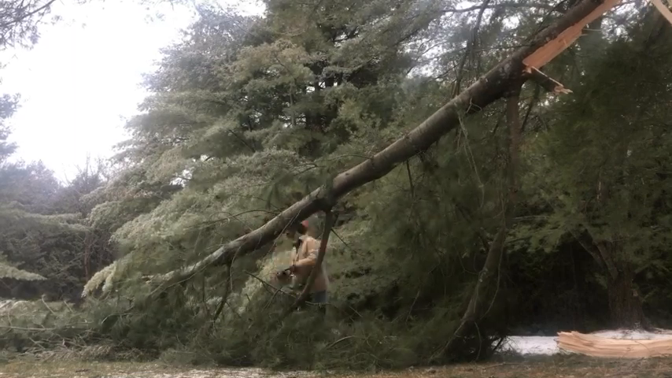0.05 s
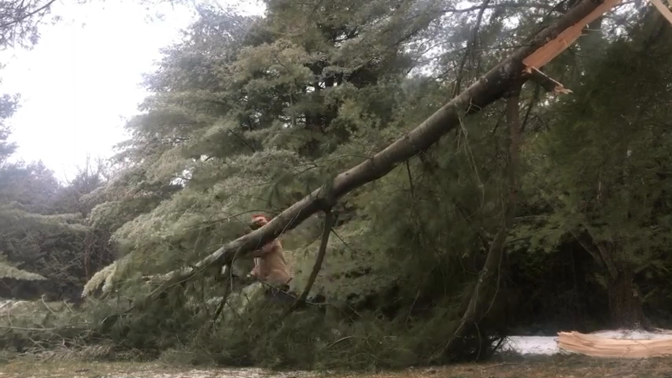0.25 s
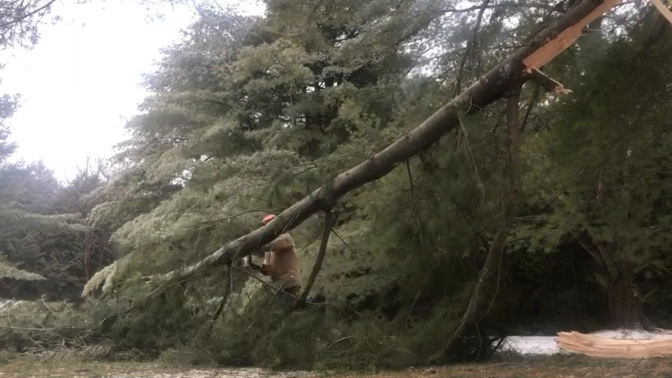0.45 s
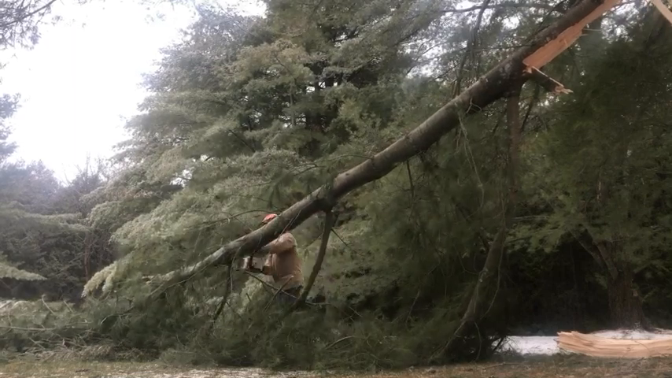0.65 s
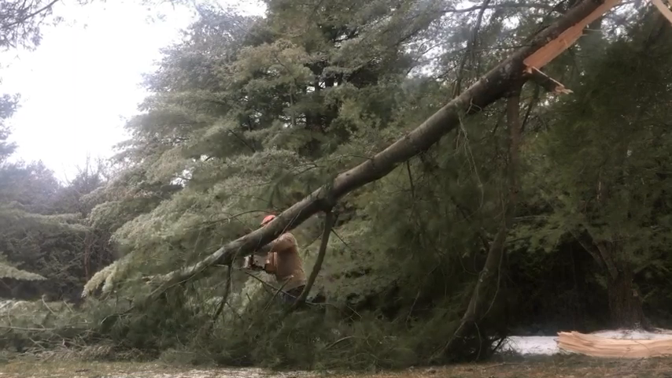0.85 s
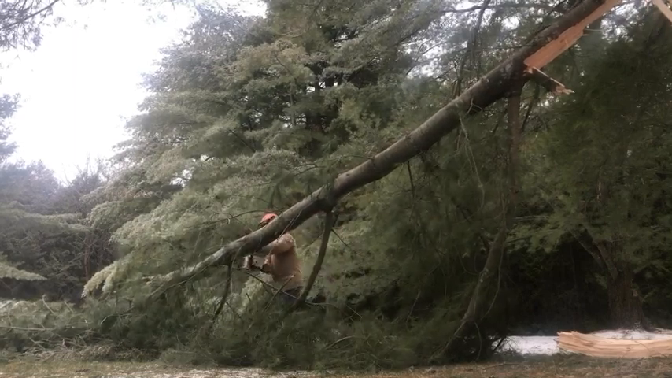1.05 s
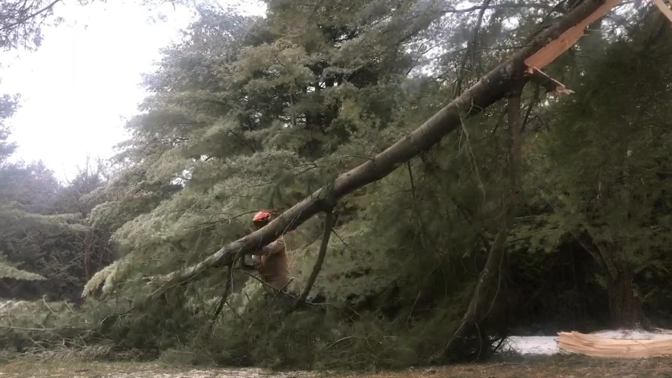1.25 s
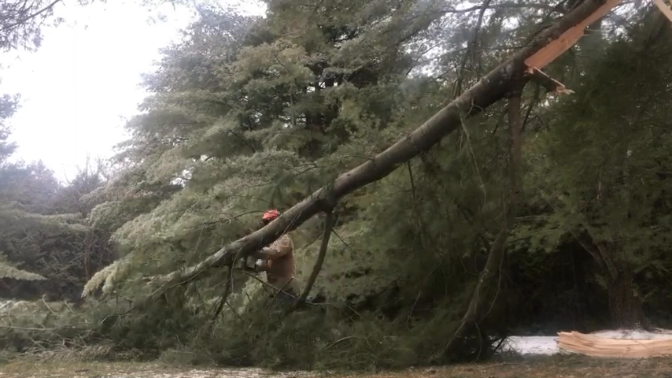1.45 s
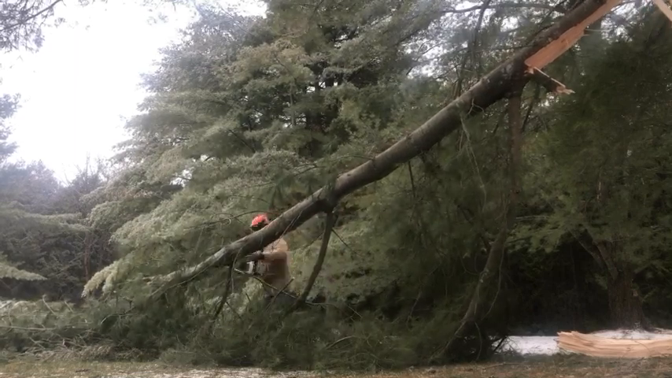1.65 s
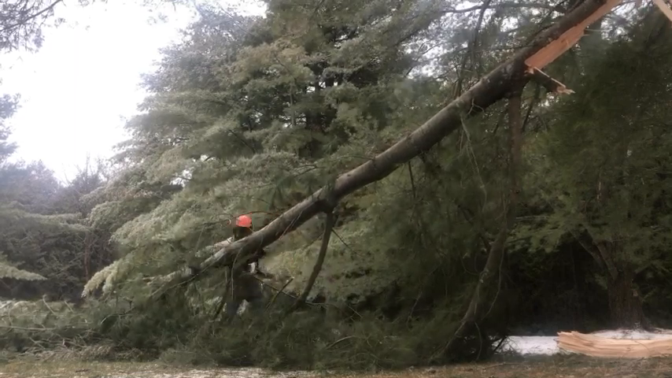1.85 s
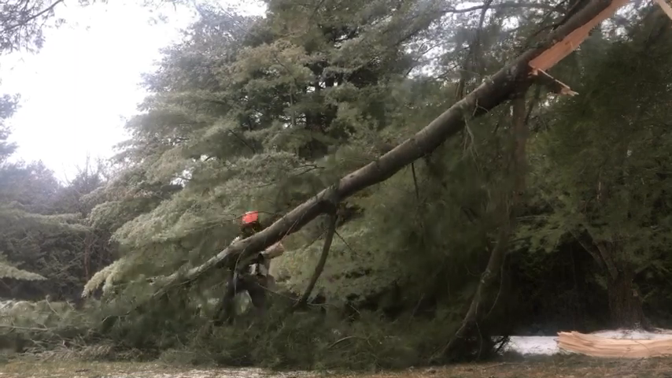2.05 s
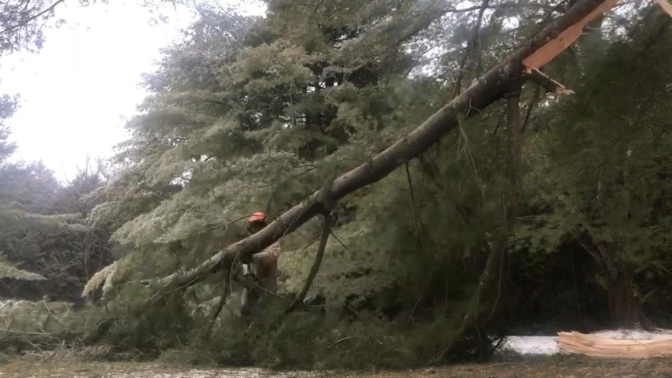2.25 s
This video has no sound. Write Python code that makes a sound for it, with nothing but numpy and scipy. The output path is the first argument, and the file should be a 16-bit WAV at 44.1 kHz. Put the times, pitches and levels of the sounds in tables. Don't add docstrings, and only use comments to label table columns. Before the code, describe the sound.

A two-stroke chainsaw ticks over briefly, blips its throttle, screams through a steady cut, then falls to an uneven puttering idle with sharp snaps and needle rustle; outdoors, some metres away, small peaky microphone.

```python
import sys
import numpy as np
from scipy import signal
from scipy.fft import rfft, irfft
from scipy.io import wavfile
from scipy.ndimage import uniform_filter1d

SR = 44100
rng = np.random.default_rng(int(sys.argv[2]) if len(sys.argv) > 2 else 0)


def transcribe(signal):
    frames = np.atleast_2d(signal).T
    limited = np.clip(frames, -1, 1)
    pcm = np.round(limited * 32767).astype(np.int16)
    wavfile.write(sys.argv[1], SR, pcm)


def linear_from_db(decibels):
    return 10 ** (np.asarray(decibels, float) / 20)


N = 101430

# freq_hz, level_db
TREE_SPECTRUM = [(120, -27), (350, -4), (900, -5.5), (1300, -17), (2000, -1.5), (3000, -8), (3500, -8),
                 (12000, -6)]
# start_s, muffler_hz, drone_db, puff_db, rustle_db
IDLE_COURSE = [(0, 215, -45, -31.5, -65), (.19, 215.5, -47, -36.5, -42.5), (1.3, 182.3, -41, -33, -51),
               (1.469, 186.4, -53, -34.5, -44), (1.62, 185.4, -48, -36, -50), (1.8, 195.3, -44, -34.5, -49),
               (1.901, 193.8, -37, -32, -62), (1.93, 217.8, -38, -33, -38),
               (2.05, 216.3, -37.5, -34, -42.5), (2.12, 230, -42, -36.5, -34),
               (2.199, 231, -39, -33, -35.5), (2.3, 236, -57, -32.5, -39.5)]
# freq_hz, width_hz, level_db
CASING_MODES = [(2820, 28, -2.5), (3477, 150, -4.5), (3840, 110, -1), (4400, 90, -5), (4760, 92, -17),
                (6300, 73, -12)]
# freq_hz, density_db (per Hz)
IDLE_AIR_SPECTRUM = [(30, -26), (90, -12.5), (220, -3.5), (400, -7.5), (700, -13.5), (1700, -24),
                     (3600, -16), (15800, -34)]
# freq_hz, width_hz, level_db
NEEDLE_BANDS = [(1370, 5000, -5.5), (4270, 880, 5), (6500, 260, -2), (7360, 990, -2), (8800, 1330, -1.5)]
# start_s, peak_db, top_end_db (against the peak)
SNAP_EVENTS = [(0.032, -25, -3), (0.059, -27, -3), (0.083, -36, -11), (0.1024, -21, -4), (0.121, -30, -16),
               (0.137, -26, -16), (0.157, -27, -8), (0.1795, -30, -6), (1.51, -23.5, -6), (1.57, -18.5, -6),
               (1.6584, -29, -8), (1.686, -21, -15), (1.712, -21.5, -1), (1.745, -21.5, -4),
               (1.7818, -20.5, -16), (1.8076, -20.5, -8), (1.8522, -24, 0), (1.8742, -24, -3),
               (1.889, -24, -6), (1.996, -22, -8), (2.078, -18.5, -14), (2.098, -22, -8), (2.1495, -20, -9),
               (2.271, -28, -8)]
# freq_hz, width_hz, level_db
THUMP_MODES = [(255, 70, 1.5), (514, 180, -2.5)]
# freq_hz, width_hz, level_db
SNAP_TOP_MODES = [(11500, 700, 1.4), (14600, 420, 0.2)]
# start_s, firing_hz, exhaust_db, hiss_db (chain and gas)
REV_BLIPS = [
    [(0.193, 106.3, -47, -61), (0.201, 111.6, -23, -30), (0.22, 124, -25.5, -22),
     (0.233, 132.4, -35, -22.5), (0.249, 124.2, -25, -27.5), (0.277, 176.2, -19.5, -17),
     (0.311, 216.6, -16.5, -16), (0.337, 179.2, -27.5, -18.5), (0.37, 138.1, -32, -20.5),
     (0.407, 100.3, -35, -27.5), (0.415, 98.3, -28.5, -15)],
    [(0.416, 115.6, -23, -31), (0.425, 134.7, -24, -18), (0.443, 153.8, -22, -17.5),
     (0.455, 145.2, -32, -19), (0.471, 131.5, -24.5, -20), (0.491, 165.5, -20, -15),
     (0.517, 200.3, -20, -16.5), (0.543, 209.2, -18.5, -15.5), (0.58, 184.4, -20, -16)],
    [(0.58, 187.2, -8, -17), (0.604, 214.1, -17, -18.5), (0.614, 220.7, -15, -13.5),
     (0.624, 207.5, -24.5, -16.5), (0.648, 183, -26, -17), (0.66, 170.5, -22, -20.5),
     (0.682, 179.4, -21.5, -16), (0.71, 168.3, -20, -16.5), (0.72, 178.7, -24.5, -19)],
]
# start_s, firing_hz, exhaust_db, hiss_db (chain and gas)
WOOD_CUT = [
    [(0.72, 183.6, -21, -13), (0.742, 206.9, -16, -16.5), (0.77, 219.3, -17, -16),
     (0.85, 220.7, -17.5, -13.5), (0.945, 217, -17, -15.5), (0.985, 225.7, -16.5, -14.5),
     (1.04, 227.4, -20, -17.5)],
    [(1.04, 228, -16.5, -19), (1.066, 228.4, -18, -14), (1.098, 191.2, -25.5, -18.5),
     (1.104, 188.9, -20.5, -16.5), (1.144, 223.3, -18, -17), (1.182, 207, -20, -15),
     (1.218, 165.5, -21.5, -17), (1.254, 163.1, -19.5, -17.5), (1.29, 167.7, -45, -26.5)],
    [(1.362, 103.3, -72, -56), (1.37, 103.3, -32.5, -34), (1.392, 107.4, -24.5, -25),
     (1.418, 103.9, -23, -23.5), (1.43, 95, -36, -29.5), (1.44, 99, -52, -21)],
]
# freq_hz, level_db
EXHAUST_RESPONSE = [(95, -3.5), (210, 2.5), (320, -2), (450, -1.5), (680, -1), (880, -2), (1080, -9.5),
                    (1320, -7)]
# freq_hz, density_db (per Hz)
GAS_RUMBLE = [(40, -11), (90, -5), (250, -2), (450, 6.5), (800, 6), (1300, 7), (1800, -6), (2400, -31)]
# freq_hz, width_hz, level_db
BODY_MODES = [(2500, 430, -4), (3165, 385, 1.5), (3920, 1020, -1.5), (6140, 880, -9.5), (8130, 1310, -7.5),
              (11000, 1800, -8), (15100, 5500, -13)]
# freq_hz, width_hz, level_db
CLUTCH_MODE = (1000, 700, -9)


def unit(x):
    return x / np.sqrt(np.mean(x ** 2))


def shape(points, hz):
    p = np.array(points)
    return linear_from_db(np.interp(np.log(hz + 1), np.log(p[:, 0]), p[:, 1]))


def noise(points=None):
    x = rng.standard_normal(N)
    if points is None:
        return x
    return unit(irfft(rfft(x) * shape(points, np.arange(N // 2 + 1) * SR / N), N))


def ring(x, modes):
    total = 0
    for k, (hz, width_hz, level_db) in enumerate(modes):
        mode = signal.lfilter(*signal.iirpeak(hz, hz / width_hz, SR), x)
        total = total + (-1) ** k * linear_from_db(level_db) * mode
    return unit(total)


def walk(rate_hz):
    k = int(SR / rate_hz)
    steps = np.repeat(rng.standard_normal(N // 64), k)[:N]
    return unit(uniform_filter1d(uniform_filter1d(steps, k), k))


def fade(times, gains, tau_s, rise=0.17):
    x = np.zeros(N)
    np.add.at(x, np.clip((np.array(times) * SR).astype(int), 0, N - 1), gains)
    pole, soft = np.exp(-1 / (tau_s * SR)), np.exp(-1 / (rise * tau_s * SR))
    decay = signal.lfilter([1], [1, -pole], x)
    return signal.lfilter([1 - soft], [1, -soft], decay)


def tree_echo(saw, t):
    decay_s, echo_db = .05, -11
    tail = noise(TREE_SPECTRUM)[:SR // 2] * np.exp(-t[:SR // 2] / decay_s)
    return linear_from_db(echo_db) * signal.fftconvolve(saw, tail / np.sqrt(np.sum(tail ** 2)))[:N]


def needle_rustle(rustle_db):
    return linear_from_db(rustle_db + 1.4 * walk(11.96)) * ring(noise(), NEEDLE_BANDS)


def muffler_drone(hz, gate):
    width_hz, sway_depth, throb = 8.3, .15, .15
    k = int(SR / width_hz)
    sway = uniform_filter1d(noise(), k) + 1j * uniform_filter1d(noise(), k)
    carrier = np.exp(2j * np.pi * np.cumsum(hz) / SR)
    return unit(np.real((1 + sway / np.std(sway) * sway_depth) * carrier) * (1 + throb * gate))


def thin_whine(t, gate):
    hz, width_hz, level_db, from_s, to_s = 10950, 150, -51, 1.69, 2.03
    on = uniform_filter1d(1. * (t > from_s) * (t < to_s), 3000)
    return linear_from_db(level_db) * on * gate * ring(noise(), [(hz, width_hz, 0)])


def idle(t):
    firing_hz, scatter, scatter_db, puff_s = 44.96, 0.2223, 2.5, 0.0046
    air_db, casing_db = -2, -5
    rows = np.array(IDLE_COURSE)
    muffler_hz, drone_db, puff_db, rustle_db = (np.interp(t, rows[:, 0], rows[:, k]) for k in (1, 2, 3, 4))
    chance = rng.standard_normal((200, 2))
    times = np.cumsum(np.exp(scatter * chance[:, 0])) / firing_hz
    heard = times < t[-1]
    puffs = unit(fade(times[heard], linear_from_db(scatter_db * chance[:, 1])[heard], puff_s))
    gate = unit(puffs + 1.6)
    air = linear_from_db(air_db) * unit(puffs + 1.46) * noise(IDLE_AIR_SPECTRUM)
    casing = linear_from_db(casing_db) * ring(gate * noise(), CASING_MODES)
    engine = linear_from_db(drone_db) * muffler_drone(muffler_hz, gate) + linear_from_db(puff_db) * (air + casing)
    return engine + thin_whine(t, gate) + needle_rustle(rustle_db)


def snaps():
    tau_s, rise, trim_db, thump_db, top_max_db = .006, .45, -8, -9, -6
    s, peak_db, top_db = np.array(SNAP_EVENTS).T
    body = ring(noise(), BODY_MODES[1:5]) + linear_from_db(thump_db) * ring(noise(), THUMP_MODES)
    low = fade(s, linear_from_db(peak_db + trim_db), tau_s, rise) * body
    high = fade(s, linear_from_db(peak_db + trim_db + np.minimum(top_db, top_max_db)), tau_s, rise)
    return low + high * ring(noise(), SNAP_TOP_MODES)


def gas_and_chain_hiss(puff, speed, rough, coast):
    highpass = signal.butter(4, 1500, "high", fs=SR, output="sos")
    gas = signal.sosfilt(highpass, ring(puff * noise(), BODY_MODES[:3]))
    gas = linear_from_db(-9.5 + 3 * (rough - 0.5)) * gas * linear_from_db(walk(30.44))
    chain_db = -3.5 + 3 * speed
    chain = linear_from_db(chain_db) * ring(ring(puff * noise(), BODY_MODES[3:]), [(9100, 22000, 0)])
    clutch = ring(ring(noise(), [CLUTCH_MODE]), [CLUTCH_MODE])
    return gas + chain * linear_from_db(walk(19.26)) + (1 - coast) * linear_from_db(CLUTCH_MODE[2]) * clutch


def bell(f, hz, width_hz, order):
    return 1 / (1 + ((f - hz) / width_hz * 2) ** order)


def firing_harmonics(hz, phase, speed, rough, coast):
    roll_hz, edge_db_per_octave, lug_db_per_octave = 1480, 11.5, 8
    frame_hz = SR / 2048
    odd_db = -5 * np.clip(1 + 2.5 * speed, 0, 1)
    lug = linear_from_db(lug_db_per_octave * np.minimum(speed + .5, 0) * coast ** 2)
    tone, power = 0, 0
    for k in range(1, 37):
        f = k * hz
        pull = uniform_filter1d(np.round(f / frame_hz) * frame_hz - f, 700) * .9 * (k > 1)
        edge = np.where(f > 1050, linear_from_db(edge_db_per_octave * speed), 1)
        pipe = shape(EXHAUST_RESPONSE, f) / (1 + (f / roll_hz) ** 12) * edge
        shell = linear_from_db(-10.5) * bell(f, 3280, 1850, 10) + linear_from_db(-3.5) * bell(f, 3450, 260, 2)
        shell = shell + linear_from_db(-16.5 + 2 * edge_db_per_octave * speed) * bell(f, 1960, 100, 4)
        gain = (pipe + shell / np.sqrt(rough)) * linear_from_db(3.5 if k == 1 else odd_db * (k % 2) * (k < 8))
        if k > 2:
            gain = gain * coast
        if 1 < k < 5:
            gain = gain * lug
        power = power + (gain * (f < roll_hz)) ** 2 / 2
        chance = np.minimum(walk(45 if k < 3 else 70), .6)
        waver_db = 1.3 * rough * min(k - .6, 2.2) ** .5 * chance
        glide_loss_db = (rough - 3) * (k > 1) + 1.3 * (rough - 2) * (k > 3)
        turns = k * phase + np.cumsum(pull) / SR + .8 * rng.random()
        tone = tone - gain * linear_from_db(waver_db - glide_loss_db) * np.cos(2 * np.pi * turns)
    return tone / np.sqrt(power)


def revs(t):
    pieces = REV_BLIPS + WOOD_CUT
    rows = np.vstack(pieces)
    rows = rows[np.diff(rows[:, 0], prepend=-1) > 0]
    hz, low_db, high_db = (uniform_filter1d(np.interp(t, rows[:, 0], rows[:, k]), 300) for k in (1, 2, 3))
    sounding = sum((t > r[0][0]) & (t <= r[-1][0]) for r in pieces)
    on = uniform_filter1d(sounding.clip(0, 1) * 1., 300)
    phase = np.cumsum(hz * (1 + .0012 * walk(60.6))) / SR
    coast = linear_from_db(.6 * np.clip(low_db - high_db + 2, -14, 0))
    speed = np.log2(hz / 215)
    glide_hz_s = uniform_filter1d(np.abs(np.gradient(hz)) * SR, 1500)
    rough = 1 + 1.8 * np.tanh(glide_hz_s / 600)
    puff = 1 + .25 * np.cos(2 * np.pi * phase)
    tone = firing_harmonics(hz, phase, speed, rough, coast)
    rumble = linear_from_db(-17 + 2.5 * (rough - 1)) * puff * noise(GAS_RUMBLE)
    hiss = gas_and_chain_hiss(puff, speed, rough, coast)
    return on * (linear_from_db(low_db) * (tone + rumble) + linear_from_db(high_db) * hiss)


def scene():
    t = np.arange(N) / SR
    saw = revs(t)
    mix = saw + tree_echo(saw, t) + idle(t) + snaps()
    return np.array([mix, mix])


def band_limit(x):
    return signal.sosfilt(signal.butter(12, 16100, fs=SR, output="sos"), x)


def record(dry):
    lowpass = signal.ellip(10, .2, 70, 15780, fs=SR, output="sos")
    mix = signal.sosfilt(lowpass, np.clip(dry, -1, 1))
    return band_limit(mix)


dry = scene()
out = record(dry)
transcribe(out)
```